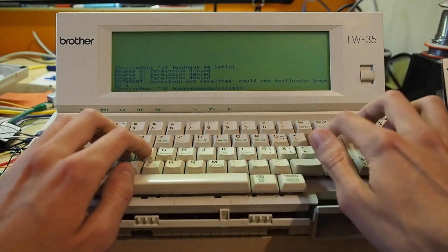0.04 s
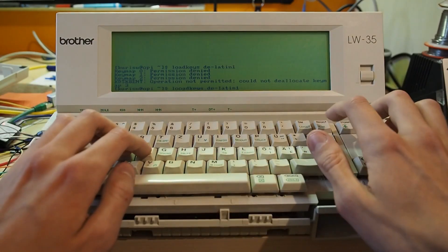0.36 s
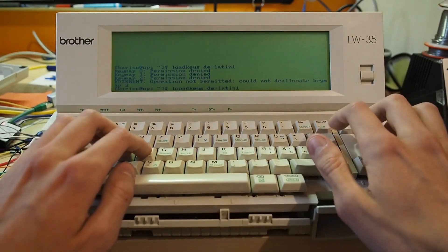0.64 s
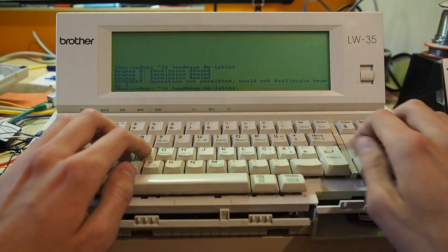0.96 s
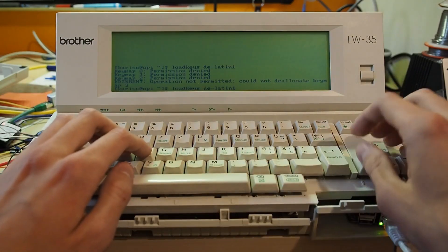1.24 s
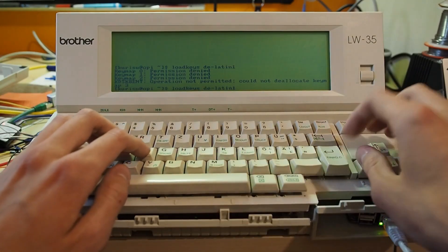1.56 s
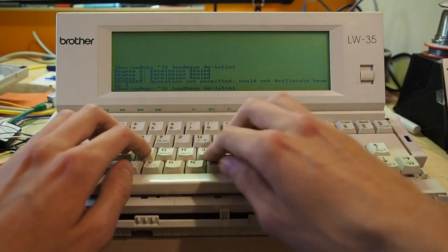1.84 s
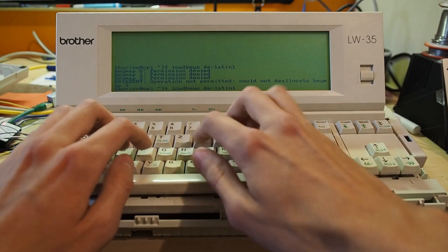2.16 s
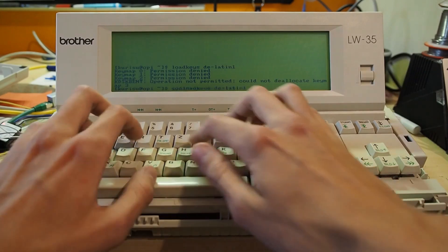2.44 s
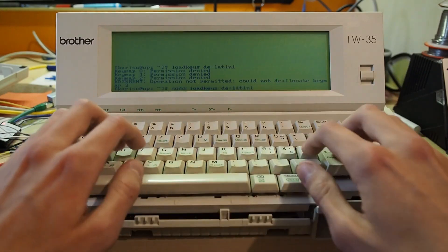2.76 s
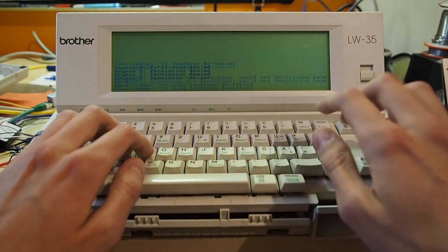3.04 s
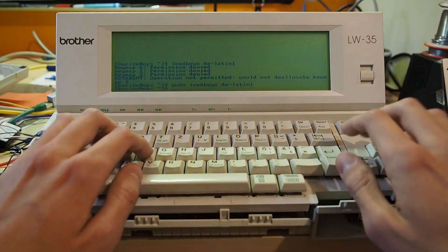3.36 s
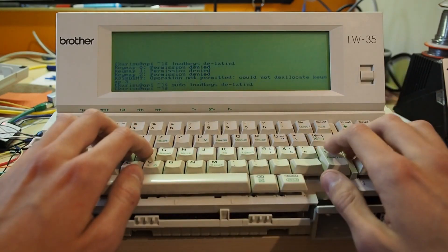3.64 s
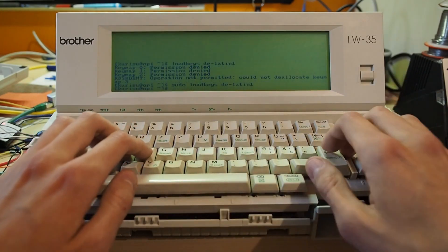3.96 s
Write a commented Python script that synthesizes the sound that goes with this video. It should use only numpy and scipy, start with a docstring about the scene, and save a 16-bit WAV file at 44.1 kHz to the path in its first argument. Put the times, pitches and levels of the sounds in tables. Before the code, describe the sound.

Plastic keys of an electronic typewriter clack in short, uneven bursts in a quiet room.

```python
"""Plastic keys of an electronic typewriter clack in short bursts, close to the microphone.
Each contact is a crack of noise and the dense ring of its cap: down strokes clack, up strokes tick and
bounce, loose caps rattle, and the hollow case rings along. Some keys thump the desk as they bottom out
and some caps sing at their own pitch; there are two short pings and one faint, very high tick.
A small, quiet room answers over hum and hiss."""
import sys
import numpy as np
from scipy import signal
from scipy.fft import rfft, irfft
from scipy.io import wavfile
from scipy.ndimage import uniform_filter1d

SR = 44100
rng = np.random.default_rng(int(sys.argv[2]) if len(sys.argv) > 2 else 0)


def store_pcm(level_fs):
    """Save levels as 16-bit WAV."""
    pcm = np.round(np.clip(level_fs, -1, 1) * 32767).astype(np.int16)
    wavfile.write(sys.argv[1], SR, np.atleast_2d(pcm).T)


N = 176400
T = np.arange(N) / SR
SIZE = 12288  # samples in one hit with its tail
KEYS_DB = 14.5  # gain on every press, release and rattle

# keys going down: t/s, relative level/dB, then EQ: knock/dB, snap/dB, click/dB, tick/dB
PRESSES = [(.002, -23.5, 11.5, -1.5, -1.5, 11.5), (.721, -14.5, -6.5, -5.5, 7.5, 3.5),
           (.7325, -10, -8.5, -11.5, 5.5, -12), (0.7403, -19.5, 3.5, -6, -7, 0),
           (1.148, -13, -0.5, -4.5, -4.5, -12), (1.290, -21, 1, -5.5, -2.5, -16),
           (1.311, -25.5, 6, -9, -7, -8), (1.444, -27, 1.5, -5, -17, -15),
           (1.589, -23.5, 2, -8.5, -15, -12), (1.877, -24, 2, -8.5, -15, -7),
           (2.121, -40, 19, 5.5, -5, -12), (2.212, -14.5, -3.5, -8.5, -13.5, 8),
           (2.2293, -19, 4, -3, -5, 0), (2.295, -19.5, 3, 0.5, -8, -5), (2.365, -12.5, -4, -1.5, -3.5, 1),
           (2.450, -17.5, 3.5, 1, 2, 5), (2.460, -20.5, 5, 12.5, 14, 15), (2.557, -22, -2, 0, -1, 10.5),
           (2.566, -22, 11, 3, 2.5, 3), (2.915, -20.5, 6, 9.5, 9, 12), (2.92, -6.5, 1.5, -0.5, 3, 9),
           (2.928, -19, -12, -3, 17, 12)]
# keys springing back: t/s, relative level/dB, then EQ: knock/dB, snap/dB, click/dB, tick/dB
RELEASES = [(0.0942, -20, 6.5, 12, 10, 6.5), (.813, -15.5, 4.5, 11.5, 7, 8),
            (1.232, -20, -0.5, 5.5, 1.5, 3), (1.385, -23.5, 4, 6.5, 2, 8.5), (1.539, -26, 0, 6, 4, 0.5),
            (1.6643, -12, -1, 6, 4.5, 4.5), (2.99, -20, 4.5, 11, 20, 6)]
# loose caps rattling under a finger, and at 3.762 and 3.959 s faint finger rubs: t/s, length/s, relative
# level/dB, treble/dB
RATTLES = [(1.136, 0.013, -31, -8), (1.643, 0.014, -35.5, 6.5), (2.348, 0.0071, -28.5, 0),
           (2.445, 0.0098, -29, 20.5), (2.469, 0.032, -18.5, 3.5), (2.615, 0.013, -27, -8),
           (2.638, 0.021, -22, 1), (2.672, .035, -26.5, -3.5), (2.733, 0.0048, -34, 3),
           (2.821, 0.016, -34.5, -5), (2.984, 0.0068, -19, 5.5), (3.762, 0.025, -44, -2),
           (3.959, 0.025, -41.5, -1)]
# a cap's knock, body, snap, click and tick bands: f/Hz
CAP_BANDS_HZ = (900, 1650, 3700, 8000, 13000)
# tone colour of each kind of contact: f/Hz, relative level/dB
PRESS_EQ = [(80, 2.5), (250, -15), (560, -10.5), (800, -2), (1600, 2.5), (2050, -1), (2500, 3),
            (4300, -0.5), (5200, -8.5), (7500, -7), (11000, -12), (16000, -22.5)]
RELEASE_EQ = [(250, -20), (560, -11), (800, 0), (1800, 3), (2080, -11), (2450, -8), (4400, -21),
              (5300, -26), (8000, -27), (12000, -18), (16000, -22.5)]
RATTLE_EQ = [(80, -20), (550, -4.5), (800, 11), (1700, 12), (2100, 5), (4200, 1), (5300, -9), (8500, -7),
             (16000, -19.5)]
# modes of the hollow case: f/Hz, t60/s, level/dB over the plain contact
CASE_MODES = [(411, 0.045, 2), (725, 0.15, 1), (812, 0.12, -7.5), (913, 0.35, -16.5), (1206, 0.26, -2),
              (1450, 0.28, 1), (1570, 0.17, -3.5), (2420, 0.25, -2)]
# short pings and one faint, very high tick: t/s, f/Hz, level/dB
PINGS = [(.003, 4170, -9.5), (.206, 11760, -26), (2.9204, 4270, 7.5)]
# keys bottoming out: t/s, f/Hz, relative level/dB
THUMPS = [(.025, 114, -37.5), (0.737, 111, -35.5), (1.157, 154.5, -36.5), (1.45, 162, -40.5),
          (1.592, 168.4, -37), (2.239, 120, -42.5), (2.473, 155.5, -34.5), (2.57, 159.7, -41),
          (2.933, 167.4, -35.5)]
# modes of case and desk in a thump: nominal ratio to its pitch, relative level/dB
THUMP_MODES = [(.7, -9.5), (1.001, 0), (1.5, -7.5), (2.601, -8)]
# caps with a pitch of their own, and at 2.921 s the lingering ring of the second ping: t/s, f/Hz, level/dB
CAP_TONES = [(.096, 944, -28), (.096, 1450, -36), (.734, 717, -34), (.815, 940, -24), (.814, 2850, -32),
             (1.667, 826, -26.5), (1.666, 1540, -28.5), (2.213, 1500, -25.5), (2.303, 409, -32.5),
             (2.366, 1550, -23.5), (2.46, 3034, -25), (2.685, 814, -36), (2.921, 4170, -21),
             (2.991, 929, -22)]
# bands of the room's tail: f/Hz, t60/s, relative level/dB
ROOM_BANDS = [(150, 0.5, 4.5), (1006, 0.36, 1.5), (4000, 0.47, -5.5), (9200, 0.34, 0.5), (14700, 0.21, 1.5)]
# stereo image of contacts and room, and of the air: f/Hz, left-right correlation
KEY_IMAGE = [(700, 0.97), (1400, 0.82), (2300, 0.25), (15000, 0.71)]
AIR_IMAGE = [(700, 0.5), (4400, 0), (8000, 1)]
# room air and microphone hiss: f/Hz, relative level/dB
AIR_EQ = [(50, -7), (185, -8), (245, -5), (315, -10), (545, -13.5), (820, -15.5), (1600, -19), (2100, -23),
          (4300, -24), (5200, -35), (8500, -29), (16000, -32)]
# machine hum: f/Hz, level/dB
HUM = [(247.6, -67.5), (829, -68)]
# fade of the deep hum: t/s, level/dB
RUMBLE_FADE = [(.3, -56), (.5, -61), (1.3, -81.5)]


def undb(db):
    """Decibels to gain."""
    return 10 ** (np.asarray(db) / 20)


def unit(x):
    """Scale to unit energy."""
    return x / np.sqrt(np.sum(x ** 2))


def curve(points, size):
    """Draw (f/Hz, value) points across the bins of a spectrum, on a log frequency axis."""
    hz, values = np.array(points, float).T
    return np.interp(np.log(np.fft.rfftfreq(size, 1 / SR) + 1), np.log(hz), values)


def add(out, at, x):
    """Mix a sound in at a time in seconds."""
    i = max(int(at * SR), 0)
    out[:, i:i + x.shape[-1]] += x[..., :out.shape[1] - i]


def equalise(x, gain):
    """Minimum-phase EQ with a gain for each bin, so attacks stay crisp."""
    cepstrum = irfft(np.log(gain + 1e-9))
    cepstrum[..., 1:SIZE // 2] *= 2
    cepstrum[..., SIZE // 2 + 1:] = 0
    return irfft(rfft(x) * np.exp(rfft(cepstrum)))


def stereo_spectra(image, size):
    """Spectra of two noises with the given left-right correlation."""
    likeness = np.clip(curve(image, size), -.99, .99)
    mid, side = rfft(rng.standard_normal((2, size)))
    return np.sqrt((1 + likeness) / 2) * mid + np.sqrt((1 - likeness) / 2) * side * np.array([[1], [-1]])


def hum_and_hiss(air_db=-52, rumble_hz=35.3):
    """The bed: room air, microphone hiss, a faint machine hum and a deep hum that dies down."""
    air = irfft(stereo_spectra(AIR_IMAGE, N) * undb(curve(AIR_EQ, N)), N)
    hum = sum(undb(db) * np.sin(2 * np.pi * (hz * T + rng.random())) for hz, db in HUM)
    rumble = undb(np.interp(T, *np.array(RUMBLE_FADE).T)) * np.sin(2 * np.pi * rumble_hz * T)
    return undb(air_db) * air / np.std(air.mean(axis=0)) + np.sqrt(2) * (hum + rumble)


def contact(ring_s, ring_db, room_db=0, crack_s=.0008):
    """Plastic hits plastic: a crack and the cap's dense ring, different at each microphone, plus room."""
    t = T[:SIZE]
    crack = np.sqrt(2) * unit(irfft(stereo_spectra(KEY_IMAGE, SIZE)) * t * np.exp(-t / crack_s))
    ring = np.sqrt(2) * unit(irfft(stereo_spectra(KEY_IMAGE, SIZE)) * np.exp(-t / ring_s))
    hit = crack + undb(ring_db) * ring
    humps = uniform_filter1d(abs(rfft(hit)) ** 2, size=121)
    flat = unit(equalise(hit, humps ** -.5))  # broad humps go, the fine grain stays
    return np.sqrt(2) * np.hypot(1, undb(ring_db)) * flat + undb(room_db) * room()


def room(onset_s=.0023, predelay_s=.0088, early_s=.013, tail_db=1, early_db=-1):
    """The room's answer to a click: early scatter off nearby surfaces and a tail whose top dies first."""
    t, noise = T[:SIZE], stereo_spectra(KEY_IMAGE, SIZE)
    tail = 0
    for hz, t60, db in ROOM_BANDS:
        band = curve([(centre, centre == hz) for centre, _, _ in ROOM_BANDS], SIZE)
        envelope = undb(db - 60 * t / t60) * (1 - np.exp(-t / onset_s))
        tail = tail + irfft(noise * band) * envelope
    early = irfft(noise)[:, ::-1] * np.exp(-t / early_s) * (t > predelay_s)
    return np.sqrt(2) * (undb(tail_db) * unit(tail) + undb(early_db) * unit(early))


def keycap(hit, eq, db, knock, snap, click, tick, ripple_db=2.6):
    """Voice a contact with the EQ of its kind, then the tone and narrow resonances of its own cap."""
    kind = undb(curve(eq, SIZE))
    kind /= np.sqrt(np.mean(kind ** 2))
    own = undb(curve(list(zip(CAP_BANDS_HZ, (knock, 0, snap, click, tick))), SIZE))
    ripple = uniform_filter1d(uniform_filter1d(rng.standard_normal(len(kind)), size=22), size=15)
    resonances = undb(ripple_db * ripple / ripple.std())
    fade_out = np.minimum((T[SIZE] - T[:SIZE]) / .04, 1)
    return 2 * undb(db + KEYS_DB) * fade_out * equalise(unit(hit), kind * own * resonances)


def key_presses():
    """A key going down lands with one short clack."""
    out = np.zeros((2, N))
    for at, *levels in PRESSES:
        add(out, at, keycap(contact(ring_s=.007, ring_db=-1), PRESS_EQ, *levels))
    return out


def hollow_case(clacks):
    """The case rings along with every contact, each mode a damped resonator."""
    out = clacks
    for hz, t60, db in CASE_MODES:
        loss = np.log(1000) / (t60 * SR)
        pole = np.exp(2j * np.pi * hz / SR - loss)
        out = out + 2 * loss * undb(db) * signal.lfilter([1], [1, -pole], clacks + 1e-18).real
    return out


def short_tones(hits, rise_s, decay_s, room_db, pitch_jitter=0, left_lead_rad=0):
    """Each tone swells and dies away at its own pitch, with a send to the room."""
    out, t = np.zeros((2, N)), T[:SIZE]
    envelope = (1 - np.exp(-(t / rise_s) ** 2)) * np.exp(-t / decay_s)
    for at, hz, db in hits:
        phase = 2 * np.pi * np.cumsum(hz * (1 + pitch_jitter * rng.standard_normal(SIZE))) / SR
        tone = undb(db) * envelope * np.sin(phase + np.array([[left_lead_rad], [0]]))
        add(out, at, tone)
        add(out, at, undb(room_db) * signal.fftconvolve(room(), tone, axes=1))
    return out


def pings():
    """Short, gritty pings and one faint, very high tick."""
    return short_tones(PINGS, rise_s=.0005, decay_s=.0007, room_db=-4, pitch_jitter=.2, left_lead_rad=1.1)


def desk_thumps(rise_s=.0084, t60_s=.18, detune=.06, gain_db=3):
    """A key at the bottom of its travel pushes softly on case and desk, waking their low modes."""
    out, t = np.zeros((2, N)), T[:SR // 2]
    envelope = undb(gain_db - 60 * t / t60_s) * (1 - np.exp(-t / rise_s))
    for at, hz, db in THUMPS:
        for ratio, mode_db in THUMP_MODES:
            mode_hz = hz * ratio * (1 + detune * rng.standard_normal())
            add(out, at, undb(db + mode_db) * envelope * np.sin(2 * np.pi * mode_hz * t))
    return out


def key_releases(bounce_s=.0113):
    """A key springs back with a tick and bounces once, softer and brighter."""
    out = np.zeros((2, N))
    for at, *levels in RELEASES:
        stroke, bounce = (contact(ring_s=.011, ring_db=2, room_db=-4) for _ in range(2))
        bright_bounce = bounce[:, 1:] + .55 * np.diff(bounce)
        add(stroke, bounce_s, undb(-4) * bright_bounce)
        add(out, at, keycap(stroke, RELEASE_EQ, *levels))
    return out


def cap_tones():
    """Some caps sing briefly at a pitch of their own, and the second ping lingers on."""
    return short_tones(CAP_TONES, rise_s=.0036, decay_s=.017, room_db=-15.5)


def cap_rattles(rebounds=3, ring_s=.0044, ring_db=4.5):
    """A loose cap chatters under a finger, or a finger rubs faintly: one contact, then unevenly spaced
    rebounds."""
    out = np.zeros((2, N))
    for at, length, db, treble in RATTLES:
        chatter = contact(ring_s, ring_db)
        for step, slip in enumerate(rng.random(size=rebounds)):
            add(chatter, length * (step + slip) / rebounds, contact(ring_s, ring_db))
        add(out, at, keycap(chatter, RATTLE_EQ, db, knock=0, snap=treble, click=treble, tick=treble))
    return out


def scene():
    """The keys play through their case, layered with tones, pings and thumps over the quiet bed."""
    low_cut = signal.butter(2, 149, "highpass", fs=SR, output="sos")  # the contacts carry no deep bass
    clacks = signal.sosfilt(low_cut, key_presses() + key_releases() + cap_rattles())
    return hollow_case(clacks) + cap_tones() + pings() + desk_thumps() + hum_and_hiss()


def record(dry, top_hz=16000, dc_offset=-.0035):
    """Clip at full scale, cut the top steeply and add a slight offset."""
    high_cut = signal.ellip(10, .2, 70, top_hz, fs=SR, output="sos")
    return signal.sosfilt(high_cut, np.clip(dry, -1, 1)) + dc_offset


dry = scene()
out = record(dry)
store_pcm(out)
```